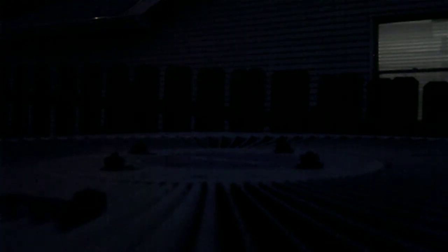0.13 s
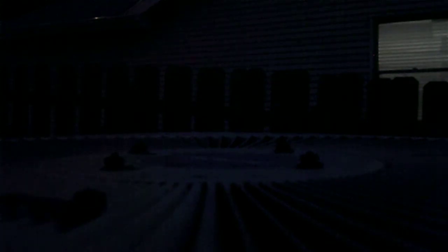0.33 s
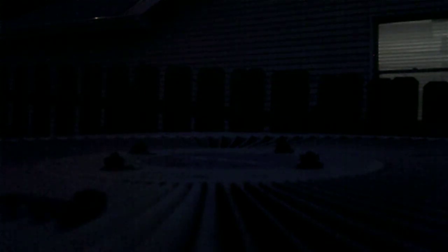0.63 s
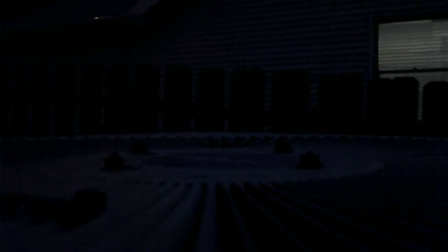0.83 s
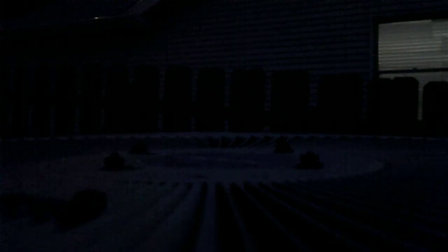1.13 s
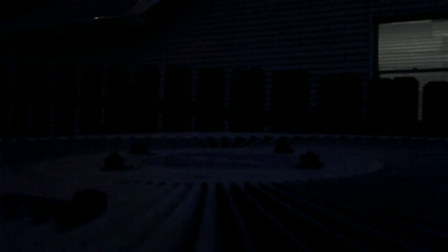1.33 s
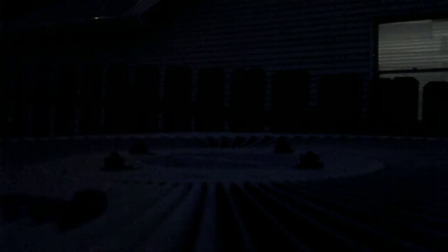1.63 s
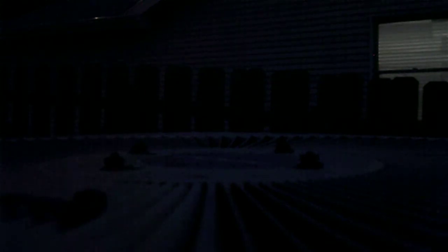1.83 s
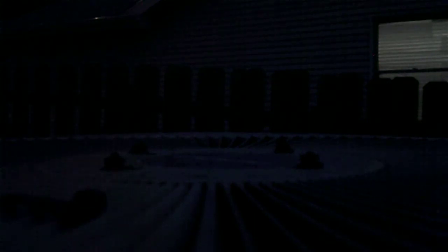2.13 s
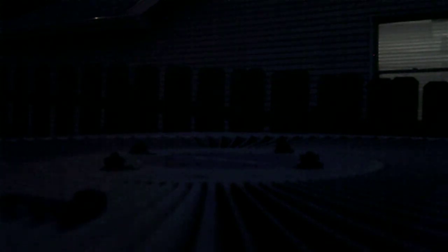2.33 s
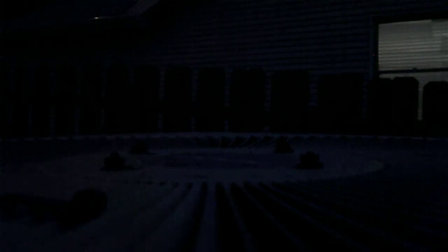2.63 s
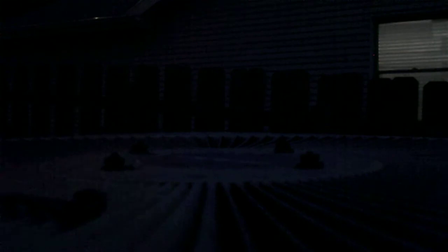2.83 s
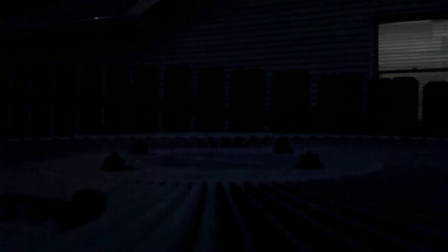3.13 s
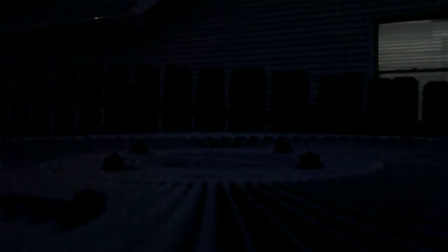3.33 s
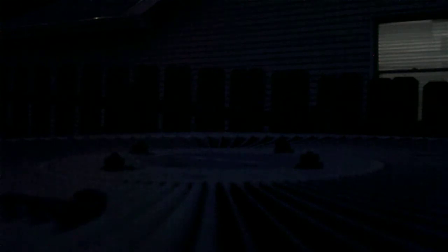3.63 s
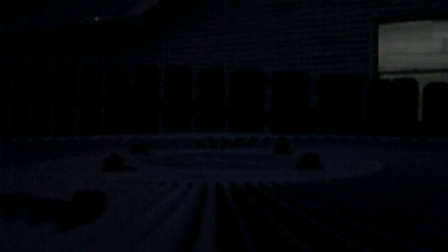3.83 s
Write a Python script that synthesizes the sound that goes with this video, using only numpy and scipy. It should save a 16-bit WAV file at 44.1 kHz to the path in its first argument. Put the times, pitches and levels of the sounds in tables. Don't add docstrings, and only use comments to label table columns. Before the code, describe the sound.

Air conditioner start-up slams on with violent, clipping metallic banging after quiet outdoor hum and rumble

```python
import sys
import numpy as np
from scipy import signal
from scipy.fft import rfft, irfft, next_fast_len
from scipy.io import wavfile
from scipy.ndimage import map_coordinates

SR = 44100
rng = np.random.default_rng(int(sys.argv[2]) if len(sys.argv) > 2 else 0)


def gain_from_decibels(decibels):
    exponent = np.asarray(decibels, float) / 20
    return 10 ** exponent


def generate_wav(signal):
    frames = np.transpose(np.atleast_2d(signal))
    scaled = np.clip(frames, -1, 1) * 32767
    pcm = np.round(scaled).astype(np.int16)
    wavfile.write(sys.argv[1], SR, pcm)


N = 176400

# freq_hz, density_db [dB per Hz]
HISS = [(2650, -37), (4500, -14), (5180, -12.5), (5910, -5), (7220, 3.5), (8090, 5), (8580, -4.5),
        (11200, -46), (18900, -120)]


def unit(x):
    return x / np.sqrt(np.mean(x ** 2) + 1e-20)


def along(points, hz):
    f, v = np.transpose(points)
    return np.interp(np.log(hz + 1), np.log(f + 1), v)


def curves(rows):
    s, *cols = np.transpose(rows)
    return [np.interp(np.arange(N) / SR, s, c) for c in cols]


def wobble(rate_hz):
    knots = rng.standard_normal(int(N * rate_hz / SR) + 4)
    return map_coordinates(knots, [np.arange(N) * rate_hz / SR])


def filtered(x, response):
    m = next_fast_len(N + SR // 2)
    return irfft(rfft(x, m) * response(np.fft.rfftfreq(m, 1 / SR)), m)[..., :N]


def noise(spectrum):
    return unit(filtered(rng.standard_normal(N), lambda hz: gain_from_decibels(along(spectrum, hz))))


def line(centre_hz, width_hz):
    return unit(filtered(rng.standard_normal(N), lambda f: np.exp(-((f - centre_hz) / width_hz) ** 2)))


def traffic():
    # freq_hz, density_db [dB per Hz]
    spectrum = [(110, -37), (180, -9), (234, -3.5), (426, -9), (1190, -5), (1790, -12.5), (2110, -24.5),
                (2640, -24.5), (5000, -61), (6500, -93.5), (11000, -120)]
    # time_s, level_db
    level = [
        (0.0, -41.5),
        (0.51, -39),
        (1.18, -42),
        (2.34, -40.5),
        (2.42, -40),
        (3.5, -41.5),
    ]
    t = np.arange(N) / SR
    level_db, = curves(level)
    far = gain_from_decibels(level_db + 1.75 * wobble(5.65)) * noise(spectrum)
    car_at_s, car_spread_s, car_db = 0.5, 0.18, -45.5
    car = gain_from_decibels(car_db) * np.exp(-((t - car_at_s) / car_spread_s) ** 2) * line(814, 76)
    return far + car


def wind():
    # freq_hz, density_db [dB per Hz]
    spectrum = [(4.7, -25.5), (8.0, 6.5), (35, 1.5), (81, -3), (101, -11.5), (128, -11), (200, -27.5),
                (220, -22), (290, -37), (480, -120)]
    # time_s, level_db
    gusts = [(0.0, -21), (0.01, -32), (1.04, -36), (1.14, -30.5), (1.66, -37), (1.71, -33), (2.17, -31),
             (2.23, -35.5), (2.8, -31.5), (3.39, -36.5), (3.42, -28), (3.5, -42)]
    gust_db, = curves(gusts)
    return gain_from_decibels(gust_db + 2.13 + wobble(8.4)) * noise(spectrum)


def neighbour():
    # freq_hz, level_db, swell_db
    fan_lines = [(76.3, -41.5, 0)]
    # time_s, pitch_hz, level_db
    drone = [(0.0, 234, -43), (0.01, 230, -50), (0.05, 231.1, -48.5), (0.52, 237, -54.5),
             (0.81, 232.3, -47), (1.09, 228.2, -54.5), (1.27, 234.8, -49.5), (1.47, 235.8, -56.5),
             (1.56, 231.3, -50.5), (1.89, 231.8, -42.5), (2.26, 231.8, -51.5), (3.04, 232.1, -41.5),
             (3.09, 230.3, -58), (3.19, 237, -43.5), (3.34, 236, -58.5), (3.5, 232.5, -46.5)]
    # time_s, pitch_hz, level_db
    mains = [(0.0, 120, -40.5), (0.38, 119.8, -46), (0.6, 119.5, -59), (0.9, 118.3, -44.5),
             (1.15, 119.2, -52), (1.45, 119.2, -44.5), (1.7, 118.1, -53), (1.88, 118.8, -45),
             (2.1, 120.4, -58), (2.4, 119, -44), (2.7, 118.5, -58), (3.5, 119, -52.5)]
    # order [multiple of shaft rate], level_db
    shaft_orders = [(3, -52), (5.04, -52.5), (6, -59.5), (8, -58.5), (9, -58.5), (10, -55), (12, -62),
                    (20.2, -59.5), (21.2, -54), (23, -56)]
    shaft_hz, shaft_width_hz = 57.4, 1.1
    t = np.arange(N) / SR
    tones = np.zeros(N)
    for hz, db, swell_db in fan_lines:
        tones += gain_from_decibels(db + swell_db * wobble(7.08)) * np.sin(2 * np.pi * hz * t + 0.59 * wobble(3.2))
    for rows in (drone, mains):
        hz, db = curves(rows)
        tones += gain_from_decibels(db) * np.sin(2 * np.pi * np.cumsum(hz) / SR)
    shaft = sum(gain_from_decibels(db) * line(k * shaft_hz, shaft_width_hz * k ** .5) for k, db in shaft_orders)
    return np.sqrt(2) * tones + shaft


def camera():
    hiss_db, tick_db, fizz_db = -75, -74.5, -66.5
    tick_rate_hz, tick_start_s = 90.9, .0015
    fizz_rate_hz, fizz_start_s, fizz_s = 5, .113, 0.022
    t, ticks = np.arange(N) / SR, np.zeros(N)
    at_s = np.arange(tick_start_s, N / SR, 1 / tick_rate_hz)
    ticks[(at_s * SR).astype(int)] = gain_from_decibels(3.1 * rng.standard_normal(len(at_s)))
    ticks = unit(filtered(ticks, lambda hz: gain_from_decibels(along(HISS, hz))))
    turn = (t - fizz_start_s) * fizz_rate_hz + 1
    size = gain_from_decibels(2.5 * rng.standard_normal(int(turn.max()) + 1))[turn.astype(int)]
    swell = np.sin(np.pi * np.clip(turn % 1 / fizz_rate_hz / fizz_s, 0, 1))
    fizz = size * swell * line(7980, 450)
    hiss = gain_from_decibels(hiss_db + 1.4 * wobble(30)) * noise(HISS)
    return hiss + gain_from_decibels(tick_db) * ticks + gain_from_decibels(fizz_db) * fizz


def slam():
    # freq_hz, density_db [dB per Hz]
    spectrum = [(300, -10), (1600, 2.5), (2800, -1), (4000, -24), (8000, -31), (10000, -47)]
    # freq_hz, level_db, t60_s
    steel = [(1120, -2, .14), (1491, -5, .15), (1700, 0, .04), (2110, -7, .35), (2417, -6, .25),
             (2649, -5, .22), (3305, -17, .15), (3500, -22, .45), (4670, -30, .36), (5580, -46, .5),
             (6300, -44, .5)]
    slam_s, attack_s = 3.5578, .004
    crash_db, crash_t60_s, steel_db = -4, 0.14, -9
    t = np.maximum(np.arange(N) / SR - slam_s, 0)
    ring = sum(gain_from_decibels(steel_db + db - 60 * t / t60_s) * np.sin(2 * np.pi * hz * t) for hz, db, t60_s in steel)
    crash = gain_from_decibels(crash_db - 60 * t / crash_t60_s) * noise(spectrum)
    return np.clip(t / attack_s, 0, 1) ** 2 * (crash + ring)


def power_on():
    return np.clip((np.arange(N) / SR - 3.5585) / 0.024, 0, 1)


def motor():
    # time_s, pitch_hz, level_db
    groan_track = [
        (3.57, 118, -34),
        (3.61, 118.5, -11),
        (3.66, 115.9, -18.5),
        (3.72, 113.7, -24),
        (3.79, 114.5, -25.5),
        (3.84, 118.1, -10.5),
        (3.9, 122.6, -11.5),
        (3.94, 101.5, -12.5),
        (4.0, 114.4, -13.5),
    ]
    # multiple, level_db
    orders = [(2, -16), (3, -23), (4, -23), (5, -24)]
    air_db, air_from_s, air_rise_s = -53, 3.73, 0.074
    hz, level_db = curves(groan_track)
    phase = 2 * np.pi * np.cumsum(hz) / SR
    groan = gain_from_decibels(3.5 * wobble(35)) * np.sin(phase)
    for k, db in orders:
        groan += gain_from_decibels(db + 4.4 * wobble(40)) * np.sin(k * phase + rng.uniform(0, 2 * np.pi))
    air = gain_from_decibels(air_db) * np.clip((np.arange(N) / SR - air_from_s) / air_rise_s, 0, 1) * noise(HISS)
    return air + power_on() * np.sqrt(2) * gain_from_decibels(level_db) * groan


def cabinet():
    # time_s, level_db
    shaking = [
        (3.57, -9.5),
        (3.716, -15.5),
        (3.762, -14),
        (3.80, -11),
        (3.852, -8.5),
        (3.882, -13.5),
        (3.905, -14.5),
        (3.946, -8),
        (3.968, -17.5),
    ]
    # freq_hz, width_hz, level_db
    modes = [(562, 163, -5.5), (873, 57, 3), (1101, 38.4, 1), (1460, 69, -0.5), (2010, 21, -12.5),
             (2730, 20.5, -26.5), (3060, 21, -25), (3290, 32, -34), (3400, 11, -24), (4270, 120, -53.5),
             (5000, 28, -48), (5510, 30, -52), (6330, 64, -52.5), (6620, 78, -50.5)]
    # freq_hz, density_db [dB per Hz]
    panel = [(35, -23.5), (60, 4.5), (584, -4), (879, 1), (1320, -13), (1520, -15), (2300, -19),
             (3520, -32.5), (4200, -53), (5460, -87), (9240, -120)]
    # freq_hz, density_db [dB per Hz]
    thud = [(20, -3), (35, 1.5), (75, -13), (95, -18), (140, -65)]
    panel_db, thud_db = -1, -18

    def resonances(f):
        total = 0
        for k, (hz, width_hz, db) in enumerate(modes):
            total = total + (-1) ** k * gain_from_decibels(db) * 1j * f * width_hz / (hz * hz - f * f + 1j * f * width_hz)
        return total

    shake_db, = curves(shaking)
    rattle = unit(filtered(rng.standard_normal(N), resonances))
    rattle = rattle + gain_from_decibels(panel_db) * noise(panel) + gain_from_decibels(thud_db) * noise(thud)
    return power_on() * gain_from_decibels(shake_db - 5.0 + 1.55 * wobble(60)) * rattle


def bangs():
    # start_s, blow_db, ring_hz, ring_db, ring_t60_s
    blows = [(3.5605, -5.5, 930.3, 8, 0.074), (3.563, -14, 202.3, -7.5, 0.38),
             (3.588, -8.5, 914, -1, 0.099), (3.610, -5, 898, -5.5, 0.17), (3.625, -10.5, 1460, -7, 0.089),
             (3.645, -8.5, 607, -9, 0.15), (3.6526, -12.5, 862, -11, 0.41), (3.741, -17, 1483, -8.5, 0.086),
             (3.7672, -15, 887, -5.5, 0.13), (3.786, -14.5, 813, -3.5, 0.1), (3.803, -12, 881, -5, 0.22),
             (3.8135, -11, 904, -10, 0.12), (3.8345, -1.5, 610, 5, 0.079), (3.8435, -1.5, 863, -2, .1),
             (3.8635, -11, 550, -19, 0.1), (3.886, -3, 771.7, 3, 0.064), (3.894, -5.5, 593, -6, 0.035),
             (3.909, -11.5, 417, -4, 0.11), (3.92, -9, 472.3, 2, 0.12), (3.933, 0.5, 489, 2, 0.08),
             (3.952, -0.5, 986, -5, 0.056), (3.98, -8.5, 422, -10, .1)]
    # freq_hz, density_db [dB per Hz]
    spectrum = [(60, 3), (300, 4), (1200, 0.5), (2500, -16.5), (4000, -34.5), (8000, -67.5)]
    blow_t60_s, blow_attack_s, ring_attack_s = 0.088, 0.0021, 0.0054
    rough_rad, rough_hz = 0.72, 69.7
    out, t = np.zeros(N + SR), np.arange(SR // 2) / SR
    crash = noise(spectrum)
    for k, (start_s, db, hz, ring_db, t60_s) in enumerate(blows):
        blow = gain_from_decibels(db - 60 * t / blow_t60_s) * (1 - np.exp(-t / blow_attack_s))
        blow = blow * crash[k * 4000:][:len(t)]
        phase = 2 * np.pi * hz * t + rough_rad * wobble(rough_hz)[:len(t)]
        ring = gain_from_decibels(ring_db - 60 * t / t60_s) * (1 - np.exp(-t / ring_attack_s)) * np.sin(phase)
        out[round(start_s * SR):][:len(t)] += blow + ring
    return out[:N]


def crackle():
    # start_s, peak_db
    snaps = [(3.582, -15), (3.5851, -18), (3.5896, -24), (3.5947, -23.5), (3.597, -19), (3.601, -22),
             (3.6049, -33), (3.6096, -32.5), (3.6131, -20.5), (3.617, -26.0), (3.62, -29.0), (3.627, -21),
             (3.636, -28.0), (3.6453, -29.0), (3.6489, -38), (3.6531, -35), (3.6637, -38), (3.6904, -42.5),
             (3.7696, -37), (3.788, -35), (3.7943, -39), (3.7982, -33), (3.81, -27), (3.8153, -35.0),
             (3.8174, -38.0), (3.826, -32), (3.832, -38.0), (3.8352, -24), (3.838, -23), (3.846, -25.0),
             (3.8518, -36.0), (3.8552, -27), (3.8615, -39.0), (3.8651, -33), (3.8786, -39.0),
             (3.8813, -33.5), (3.8887, -28), (3.8918, -34), (3.896, -27), (3.8995, -33), (3.9093, -30),
             (3.9185, -33.0), (3.9223, -33), (3.926, -28), (3.9279, -33), (3.9313, -25), (3.9345, -19.0),
             (3.9398, -25), (3.9432, -19), (3.9524, -21), (3.9566, -23), (3.9607, -37.0), (3.9635, -36.5),
             (3.979, -34)]
    # freq_hz, density_db [dB per Hz]
    spectrum = [(1200, -15), (3000, 6.5), (5500, -10.5), (8200, -10.5), (10000, -11), (15000, -3)]
    gain_db, t60_s = 6.5, 0.0047
    t = np.arange(N) / SR
    envelope = np.zeros(N)
    for start_s, db in snaps:
        envelope += (t > start_s) * gain_from_decibels(db + gain_db - 60 * np.maximum(t - start_s, 0) / t60_s)
    return envelope * noise(spectrum)


def scene():
    ambience = traffic() + wind() + neighbour() + camera()
    startup = slam() + motor() + cabinet() + bangs() + crackle()
    return (ambience + startup)[None]


def roll_off(x):
    return signal.sosfilt(signal.butter(12, 15830, fs=SR, output="sos"), x)


def record(dry):
    soft_top, hardness, clip_top = .75, 20, .712
    band_hz, leak_db = 7880, -27
    converter_hz, image_db = 16000, -33
    t = np.arange(N) / SR
    dry = dry * np.clip(0.62 + t / .004, 0, 1)
    x = dry / (1 + np.abs(dry / soft_top) ** hardness) ** (1 / hardness)
    x = filtered(x, lambda hz: gain_from_decibels(leak_db) + 1 / (1 + (hz / band_hz) ** 24))
    flat = np.clip(x, -clip_top, clip_top)
    image = (x - flat) * np.cos(2 * np.pi * converter_hz * t)
    return roll_off(flat + gain_from_decibels(image_db) * image)


dry = scene()
out = record(dry)
generate_wav(out)
```